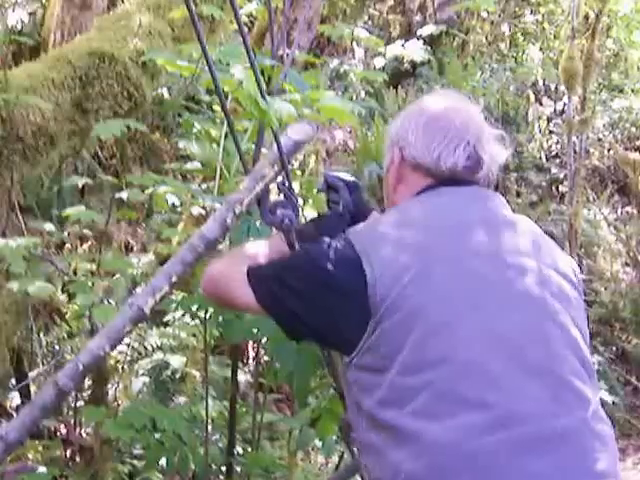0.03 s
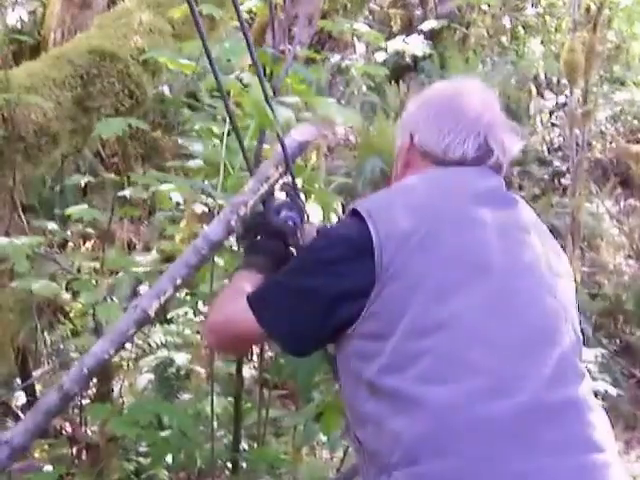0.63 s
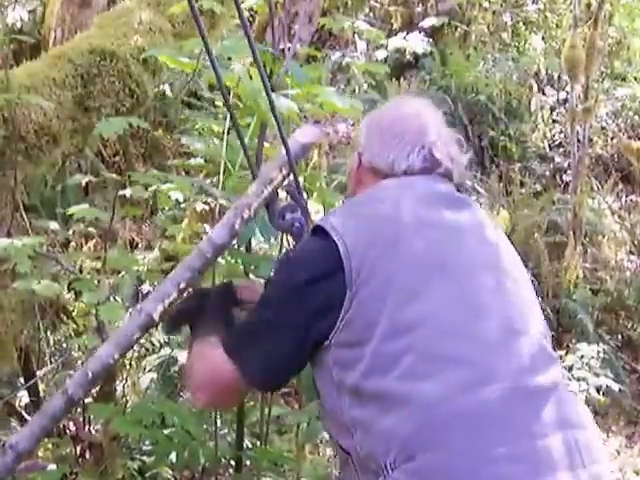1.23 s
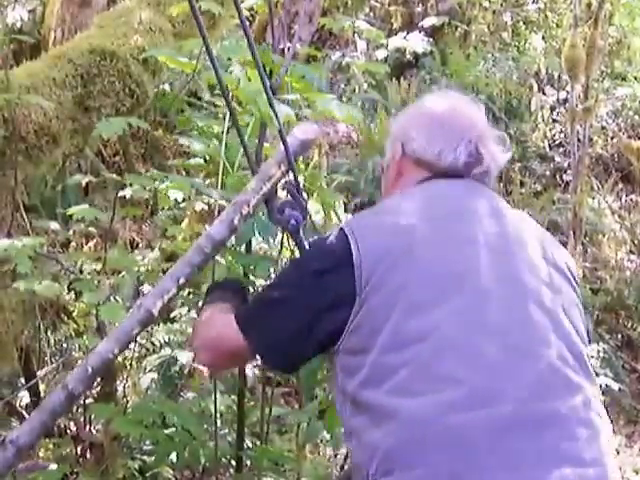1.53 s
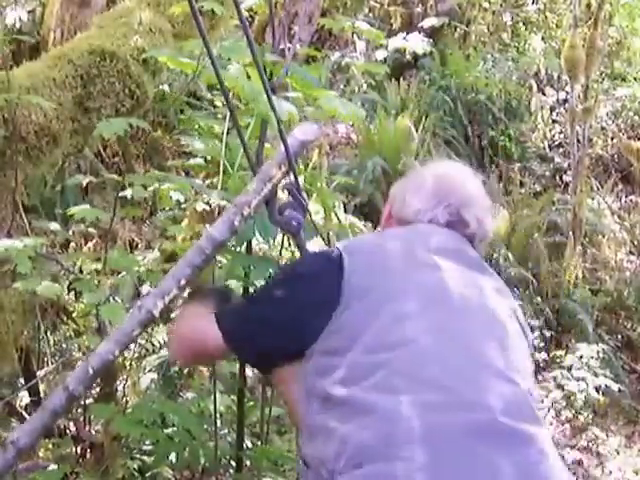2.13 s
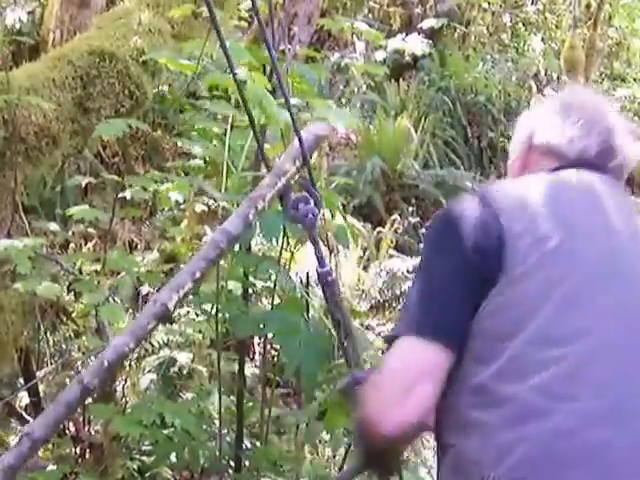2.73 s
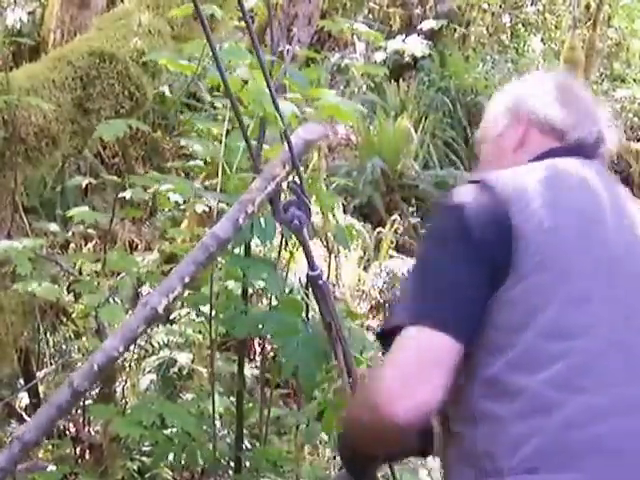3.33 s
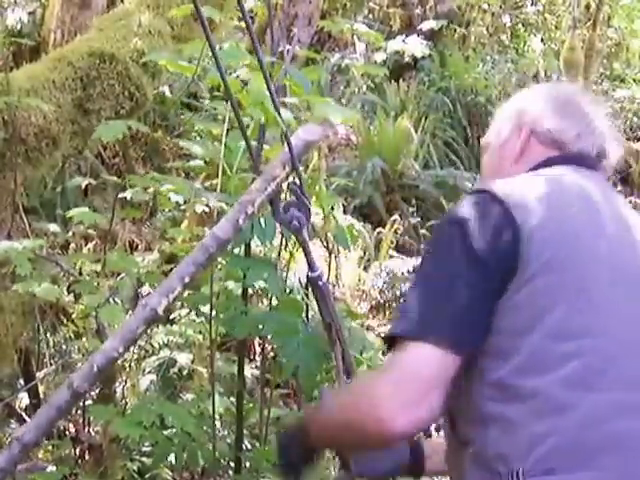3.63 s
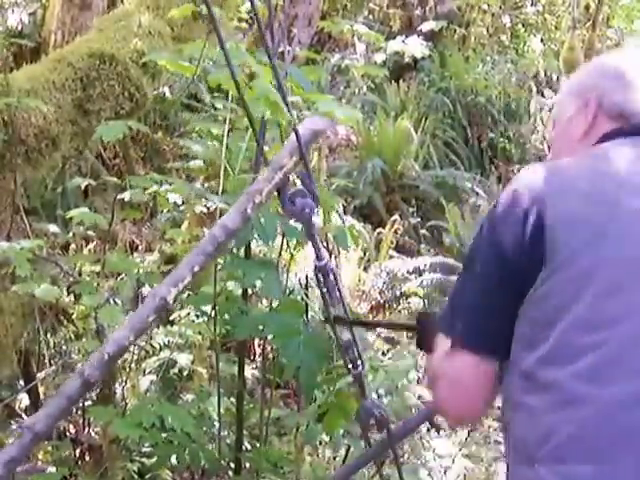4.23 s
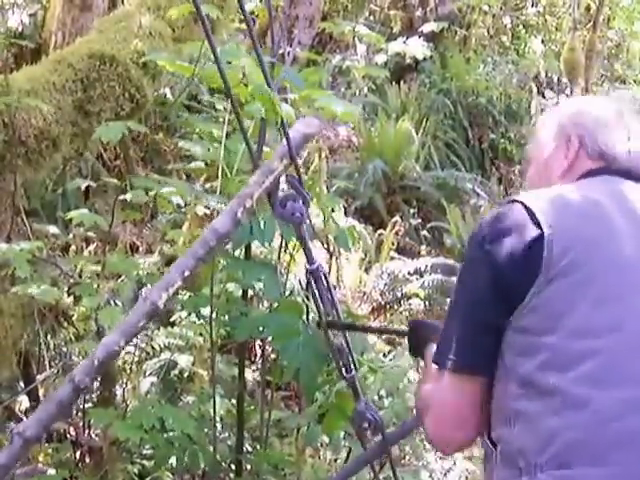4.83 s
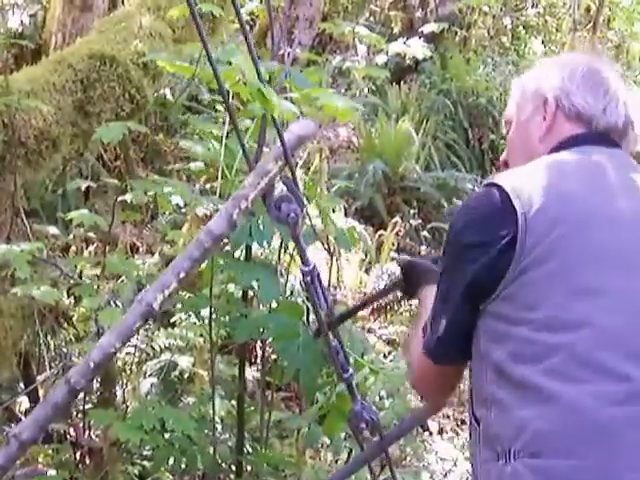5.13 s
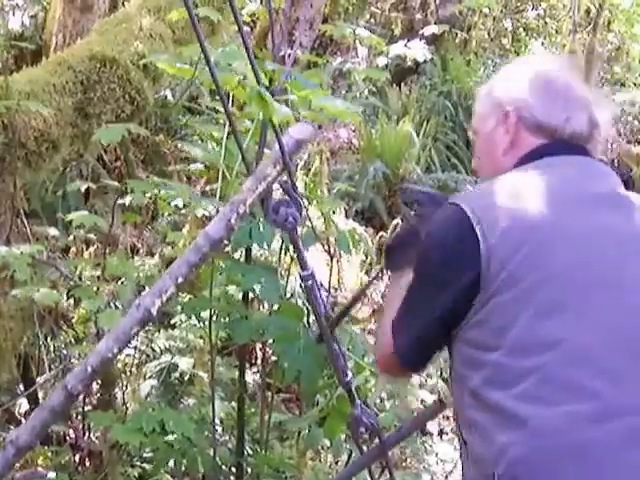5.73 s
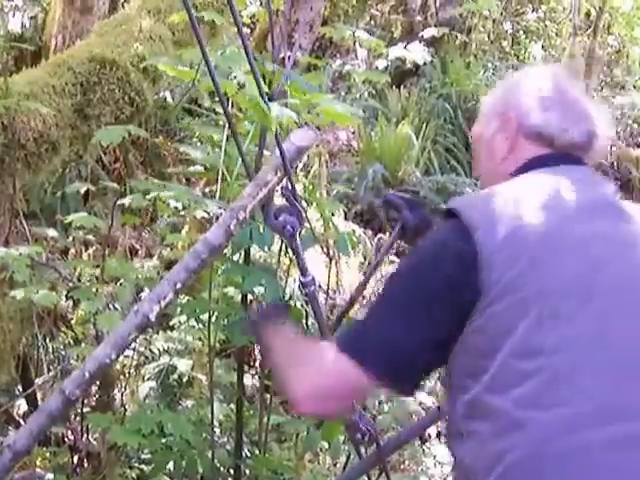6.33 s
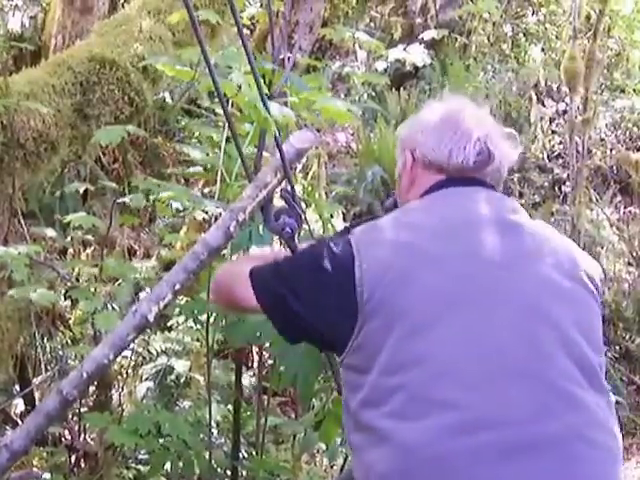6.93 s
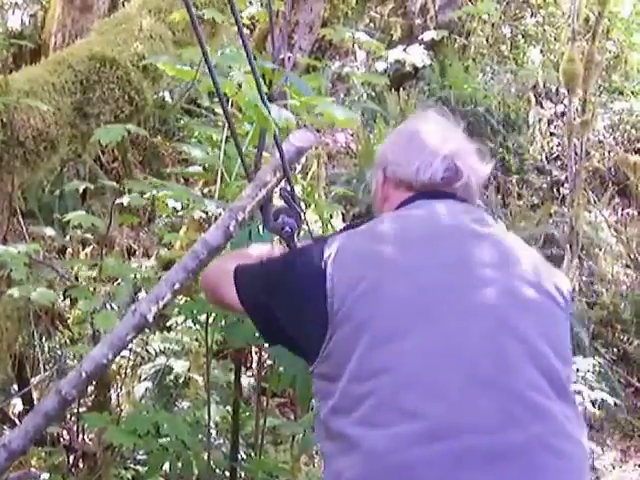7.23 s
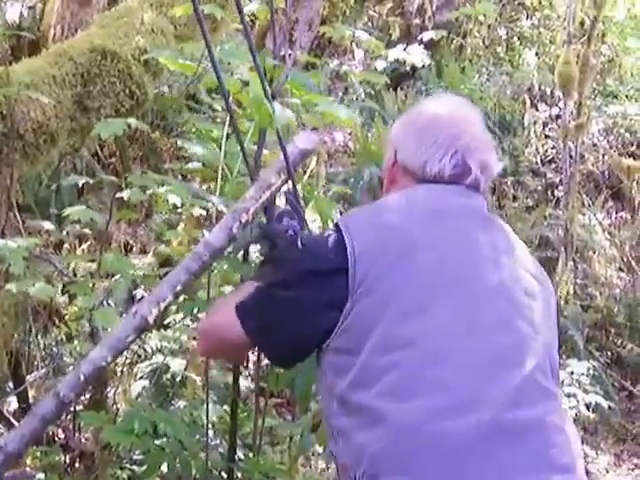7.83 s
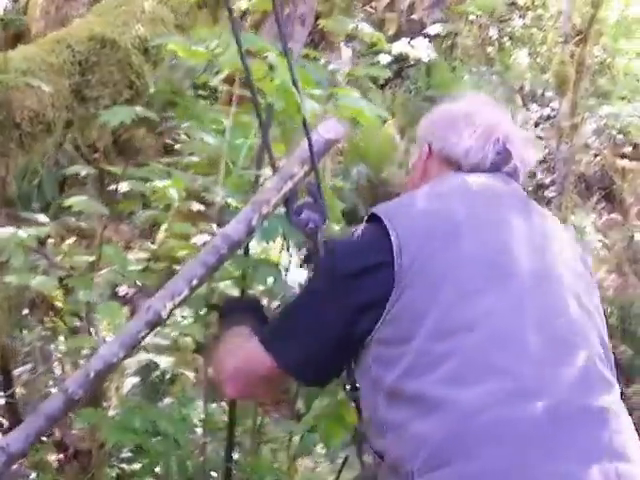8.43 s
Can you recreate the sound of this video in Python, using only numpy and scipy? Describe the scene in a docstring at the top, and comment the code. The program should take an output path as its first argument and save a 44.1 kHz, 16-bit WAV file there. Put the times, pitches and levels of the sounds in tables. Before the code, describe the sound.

A bar levers a steel turnbuckle round on a taut cable in woodland. At each of about five pulls, the dry thread sticks and slips in a cluster of short, high, gritty squeals that ring the steel and set the cable humming low. Between pulls the bar ticks, clothes and leaves rustle softly and the cable groans faintly. Quiet microphone hiss, flutter and a thin whine run underneath.

```python
"""Hiss comes on, and at once a dry thread squeals: a bar levers a steel turnbuckle round, in woodland.
At each pull the thread sticks and slips in short, gritty squeals that ring the steel and jolt its taut
cable; the trees answer faintly. Between pulls the bar ticks, clothes and leaves rustle and the loaded
cable groans. Beneath it all run the hiss, thin whine and soft flutter of a camera."""
import sys
import numpy as np
from scipy import signal
from scipy.fft import rfft, irfft, next_fast_len
from scipy.io import wavfile

SR = 44100
rng = np.random.default_rng(int(sys.argv[2]) if len(sys.argv) > 2 else 0)


def store_wav(level_fs):
    """Save 16-bit WAV to argv[1]."""
    pcm = np.round(np.clip(np.atleast_2d(level_fs), -1, 1) * 32767)
    wavfile.write(sys.argv[1], SR, pcm.T.astype(np.int16))


N = 373527
TIME = np.arange(N) / SR

# slips of the thread: (t/s, level/dB, f/Hz, duration/s, relative overtone level/dB, relative grit level/dB)
SLIPS = [ (.381, -21, 2590, .0074, -3.5, -12), (.406, -22.5, 2654, 0.0068, -8, -7),
         (1.074, -18, 2466, 0.0085, 1, -9), (1.102, -19, 2702, 0.0065, 2, -5),
         (1.150, -19, 2675, 0.0088, -2, -8.5), (2.24, -20, 2502, .011, -3, -3.5),
         (2.282, -17.5, 2780, 0.01, -3.5, -7), (2.32, -22.5, 2690, .007, -25, -0.5),
         (2.349, -22, 2380, 0.0076, -29, -19), (2.369, -21.5, 2407, 0.0071, -26, -11.5),
         (2.733, -44.5, 2280, .022, -24, -22), (2.765, -32, 2330, .006, -32, -34),
         (5.095, -51, 2710, .028, -28, -7), (5.743, -19, 2480, 0.0073, -1, -16),
         (5.763, -17.5, 2573, .0095, 0, -15.5), (5.7905, -19, 2606, 0.0092, 2.5, -1.5),
         (5.8285, -16, 2720, 0.0051, -2.5, -9.5), (8.057, -46.5, 2360, 0.0062, -25, -29),
         (8.106, -28, 2370, .010, 0.5, -33), (8.116, -21.5, 2364, 0.0091, 3, -34),
         (8.136, -21.5, 2476, .0074, 3, -9), (8.164, -22.3, 2500, .0105, 4.5, 2)]


def from_db(db):
    """Amplitude ratio of a level in decibels."""
    return 10 ** (np.asarray(db) / 20)


def rms_one(x):
    """Normalisation to unit rms."""
    return x / np.sqrt(np.mean(x ** 2) + 1e-20)


def add(track, start_s, sound):
    """Superposition: a sound adds to the track from its onset."""
    at = int(start_s * SR)
    track[at:at + len(sound)] += sound[:N - at]


def swell(length_s):
    """A half-sine envelope."""
    return np.sin(np.pi * np.minimum(TIME[:SR // 4] / length_s, 1))


def coloured_noise(spectrum):
    """Spectral shaping of white noise, at unit rms."""
    hz, db = np.transpose(spectrum)
    size = next_fast_len(N)
    bins = np.maximum(np.fft.rfftfreq(size, 1 / SR), 1)
    gain = from_db(np.interp(np.log(bins), np.log(hz), db))
    return rms_one(irfft(rfft(rng.standard_normal(size)) * gain, size)[:N])


def band_noise(hz, octaves):
    """A quarter second of band-limited noise, at unit rms."""
    edges = np.clip(hz * 2 ** (np.array([-.5, .5]) * octaves), 10, SR / 2 - 1000)
    bandpass = signal.butter(2, edges, "band", fs=SR, output="sos")
    return rms_one(signal.sosfilt(bandpass, rng.standard_normal(SR // 2))[-(SR // 4):])


def camera(flutter_hz=30.013, whine_hz=6902, unevenness=.42, pull_push_s=.003):
    """A nearly periodic impulse train from the mechanism is heard as flutter, over hiss and a pure tone."""
    # microphone hiss and rumble: (f/Hz, relative spectral level/dB)
    hiss_spectrum = [(12, 1.5), (35, 6.5), (70, 0.5), (140, -5), (250, -15.5), (480, -19.5), (1000, -23.5),
                     (1800, -28), (4000, -30), (6600, -31.5), (7300, -34.5), (7800, -47), (9000, -73)]
    # level of hiss and flutter together, which sinks after the hardest pulls: (t/s, level/dB)
    drift = [(0.55, -53.5), (1.76, -59.5), (2.58, -56.5), (2.89, -57.5), (5.69, -58.5), (6.59, -63),
             (8.47, -61.5)]
    beats = np.arange(.0158, TIME[-1] - .05, 1 / flutter_hz)
    knocks = np.zeros(N)
    for s, chance in zip(beats, rng.standard_normal((len(beats), 6))):
        # a pull, a push, then a looser, weaker rebound
        add(knocks, s - pull_push_s / 2 + .00038 * chance[0], [-.74 * (1 + unevenness * chance[1])])
        add(knocks, s + pull_push_s / 2 + .00042 * chance[2], [1 + unevenness * chance[3]])
        add(knocks, s + .019 + .002 * chance[4], [.35 * chance[5]])
    body = signal.sosfilt(signal.butter(1, [50, 200], "band", fs=SR, output="sos"), knocks + 1e-18)
    flutter = signal.sosfilt(signal.butter(3, 560, fs=SR, output="sos"), body)
    whine = rms_one(np.sin(2 * np.pi * whine_hz * TIME))
    steady = from_db(12.5) * coloured_noise(hiss_spectrum) + from_db(6) * rms_one(flutter)
    return steady * from_db(np.interp(TIME, *np.transpose(drift))) + from_db(-73) * whine


def squeals(sag=.1, waver=.014, third_db=-12, roughness=.18):
    """Stick-slip oscillation: the thread chatters briefly, sinking in pitch as the load lets go."""
    # friction noise of the thread: (f/Hz, relative spectral level/dB)
    grit_spectrum = [(200, 1.5), (700, 3), (1100, -6.5), (1600, -13), (1950, 18.5), (2700, 20.5),
                     (3400, 12), (4200, 5.5), (5300, 14.5), (6300, 12.5), (7600, -30), (8500, -16)]
    out, friction, t = np.zeros(N), coloured_noise(grit_spectrum), TIME[:SR // 4]
    for s, db, hz, length, overtone_db, grit_db in SLIPS:
        pitch = hz * (1 + sag * (.5 - np.minimum(t / length, 1)) + waver * band_noise(240, 2.5))
        phase = 2 * np.pi * np.cumsum(pitch) / SR
        first, second, third = np.sin(np.outer([1, 2, 3], phase))
        tone = first + from_db(overtone_db) * (second + from_db(third_db) * third)
        tone *= 1 + roughness * band_noise(450, 1.42)
        grit = from_db(grit_db) * friction[int(s * SR):][:len(t)]
        add(out, s, from_db(db) * swell(length) * (tone + grit))
    return out


def jolts(jolt_db, per_level, per_grit, typical_slip_db=-20, typical_grit_db=-8):
    """Excitation in dB follows a power law: the harder and grittier a slip, the more it shakes a part."""
    _, db, _, _, _, grit_db = np.transpose(SLIPS)
    return jolt_db + per_level * (db - typical_slip_db) + per_grit * (grit_db - typical_grit_db)


def strike(modes, times, levels_db, scatter_db):
    """Free vibration: each blow excites every damped mode with a strength of its own."""
    hz, db, t60 = np.transpose(modes)[:, :, None]
    t, out = TIME[:SR // 2], np.zeros(N)
    rings = from_db(db - 60 * t / t60) * np.sin(2 * np.pi * hz * t)
    polarity = (-1) ** np.arange(len(modes))
    for s, level_db in zip(times, levels_db):
        strengths = from_db(level_db + scatter_db * rng.standard_normal(len(modes)))
        add(out, s, (strengths * polarity) @ rings)
    return out


def clashes(spectrum, times, levels_db, t60, rise_s):
    """Contact noise decays exponentially as the linked parts shake against each other and settle."""
    t, envelope = TIME[:SR // 4], np.zeros(N)
    for s, db in zip(times, levels_db):
        add(envelope, s, from_db(db - 60 * t / t60) * np.minimum(t / rise_s, 1))
    return envelope * coloured_noise(spectrum)


def steel_ring(grip_rise=.022, detune_db=-35):
    """Resonance: the steel's modes nearest a harmonic of the gripping thread take up the most energy."""
    # modes of the turnbuckle: (f/Hz, level/dB, T60/s)
    steel_modes = [(1450, -17, .15), (1823, -2, 0.12), (2093, -6, 0.052), (2253, 3, 0.076),
                   (2340, -22, .42), (2620, -31.5, .3), (2730, -5.5, 0.19), (2930, -26, .35),
                   (2930, 4, 0.058), (2903, -5, 0.071), (3210, -17, 0.21), (3550, -7, 0.11),
                   (4210, -16.5, 0.24), (5060, -13, .17), (5100, -3.5, .13), (5420, -10.5, 0.17),
                   (5400, -22.5, .2), (5600, -0.5, 0.08), (5300, -18.5, .22), (5700, -6.5, 0.15),
                   (6100, -18, 0.22), (7370, -26, 0.16)]
    # clash of threads and eyes: (f/Hz, relative spectral level/dB)
    clash_spectrum = [(250, -5), (500, -12), (800, -11), (1200, -18.5), (1650, -16), (1950, -6.5),
                      (2400, 2), (2850, -2.5), (3400, -10.5), (4500, -18), (5200, -2), (5700, -1.5),
                      (6200, -17.5), (8000, -24.5)]
    start, _, pitch, length, _, _ = np.transpose(SLIPS)
    catch = start + length / 2
    jolt_db = jolts(-18.7, per_level=1.05, per_grit=.5)
    grip_hz = pitch[:, None] * (1 + grip_rise)   # the contact stiffens as it grips
    multiple = np.array(steel_modes)[:, 0] / grip_hz
    uptake_db = detune_db * np.minimum(np.abs(multiple - np.round(multiple)), .25)
    ring = strike(steel_modes, catch, jolt_db[:, None] + uptake_db, scatter_db=2)
    clash = clashes(clash_spectrum, catch, jolt_db, t60=.069, rise_s=.0026)
    return from_db(-17) * ring + from_db(-10) * clash


def cable_shake(limit_db=-22.3, soften_db_per_s=.5):
    """Impulsive excitation: each slip sets the cable's low modes humming over a rough thud."""
    # modes of the cable and its anchor: (f/Hz, level/dB, T60/s)
    cable_modes = [(43.7, -11.5, 0.29), (100, -13, 0.062), (155, -11, 0.21), (182.7, -1, 0.37),
                   (209.4, -10, 0.24), (244, -12, 0.22), (400, -25, 0.053), (540, -24.5, 0.047),
                   (699.6, -19, 0.19), (810, -27, .07)]
    # thud of the jolted cable: (f/Hz, relative spectral level/dB)
    thud_spectrum = [(20, -2), (45, 9), (75, -13.5), (115, -4), (150, -7), (190, 0.5), (250, -11.5),
                     (320, -20.5), (700, -23), (1000, -27.5), (1600, -46)]
    start, _, _, length, _, _ = np.transpose(SLIPS)
    catch = start + length / 2
    # the low hum and thud of each slip are capped in level and grow softer with each later pull
    jolt_db = np.minimum(jolts(-21, per_level=.8, per_grit=.15), limit_db) - soften_db_per_s * start
    hum = strike(cable_modes, catch, jolt_db, scatter_db=4)
    thud = clashes(thud_spectrum, catch, jolt_db, t60=.22, rise_s=.006)
    return from_db(-4) * hum + from_db(-7) * thud


def scatter(x, t60, delay_s):
    """Diffuse reflection: convolution with dense, dying echoes of unit energy."""
    t = TIME[:SR // 2]
    echoes = rng.standard_normal(len(t)) * from_db(-60 * t / t60) * np.clip(t / delay_s - .5, 0, 1)
    return signal.fftconvolve(x, echoes / np.linalg.norm(echoes))[:N]


def turnbuckle():
    """Coupled vibration: slips drive steel and cable, and reflect within the fitting and off the trees."""
    squeal, steel, cable = squeals(), steel_ring(), cable_shake()
    rattle = from_db(-9) * scatter(squeal, t60=.036, delay_s=.0061)
    # the steel radiates all round, so it returns from the trees more strongly than the squeal
    woods = scatter(from_db(-23) * squeal + from_db(-10) * steel, t60=.26, delay_s=.015)
    return squeal + rattle + steel + cable + woods


def ticks(rise_s=.00089):
    """Impact of bar on fitting: a bright crack, a short ring and a dull knock decay together."""
    # contacts of the bar: (t/s, level/dB, ring f/Hz, T60/s, knock level/dB relative to the ring)
    contacts = [(.507, -27.5, 3550, .012, -0.5), (.548, -21.5, 1870, 0.0081, -12),
                (.707, -41, 3000, .008, -8), (2.651, -35, 5500, 0.0082, -20), (2.67, -40, 6100, .012, -20),
                (4.64, -43.5, 4400, .011, -4), (5.226, -45.5, 3400, 0.02, 0), (7.355, -50.5, 2700, .08, 3),
                (8.027, -42.5, 4540, 0.017, -8)]
    out, t = np.zeros(N), TIME[:SR // 4]
    for s, db, hz, t60, knock_db in contacts:
        crack = from_db(-7) * band_noise(hz=3200, octaves=1.8)
        knock = from_db(knock_db) * band_noise(hz=730, octaves=1.4)
        ring = band_noise(hz, octaves=.38)
        envelope = from_db(db - 60 * t / t60) * np.minimum(t / rise_s, 1)
        add(out, s, envelope * (ring + crack + knock))
    return out


def rustles(grain_db=2.5):
    """Sliding friction of clothes and leaves: a grainy swish over a duller brushing."""
    # shifts of the body: (t/s, duration/s, level/dB, centre f/Hz, bandwidth/octaves)
    movements = [(.595, .15, -53, 2900, 1.5), (2.444, 0.046, -55, 3300, 0.81),
                 (2.934, .12, -60.5, 4300, 1.7), (3.429, .16, -54, 4200, 1.24),
                 (4.029, 0.17, -63.5, 2300, .3), (6.106, 0.043, -60.5, 4600, 1.3),
                 (6.145, 0.19, -57, 4440, 1.1), (6.273, 0.06, -55.5, 3800, 1.7),
                 (7.748, 0.13, -57.5, 3660, .65)]
    out = np.zeros(N)
    for s, length, db, hz, octaves in movements:
        swish = band_noise(hz, octaves)
        brush = from_db(-6) * band_noise(hz=1500, octaves=1.56)
        envelope = from_db(db + grain_db * band_noise(hz=120, octaves=4)) * swell(length)
        add(out, s, envelope * (swish + brush))
    return out


def groans():
    """Creep under load: a narrow, low resonance of the cable swells and fades, with a faint rasp."""
    # creeps of the cable: (t/s, duration/s, level/dB, f/Hz)
    creeps = [(.62, 0.079, -39.5, 209), (2.44, 0.155, -43.5, 206), (2.734, .1, -44, 210),
              (5.078, .1, -35.5, 191), (7.361, .19, -39, 200), (7.754, 0.049, -42, 223)]
    # stirring of the anchor and rasp in the fitting: (centre f/Hz, bandwidth/octaves, relative level/dB)
    bands = [(111.4, 0.37, -10), (494, 0.99, -18), (2530, 0.58, -23.5)]
    out = np.zeros(N)
    for s, length, db, hz in creeps:
        partials = sum(from_db(part_db) * band_noise(part_hz, width) for part_hz, width, part_db in bands)
        add(out, s, from_db(db) * swell(length) * (band_noise(hz, octaves=.23) + partials))
    return out


def scene():
    """Superposition of all sources at one point."""
    return (turnbuckle() + groans() + ticks() + rustles() + camera())[None]


def record(dry, start_s=.3795, top_hz=7250, cutoff_hz=7900):
    """Gating and band limiting: sound comes on after a silence; the treble rolls off, then ends steeply."""
    dull = signal.sosfilt(signal.butter(10, top_hz, fs=SR, output="sos"), dry * (TIME >= start_s))
    return signal.sosfilt(signal.ellip(10, .3, 75, cutoff_hz, fs=SR, output="sos"), dull)


dry = scene()
out = record(dry)
store_wav(out)
```